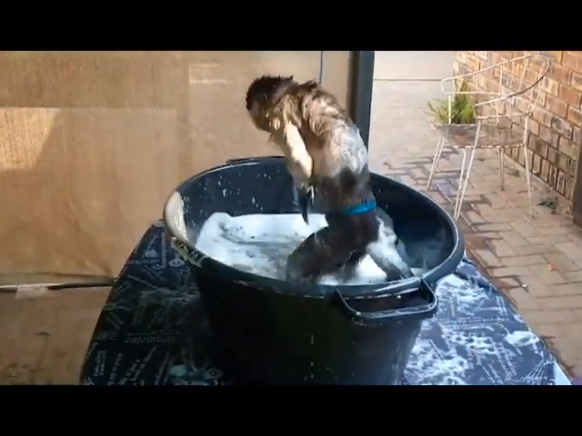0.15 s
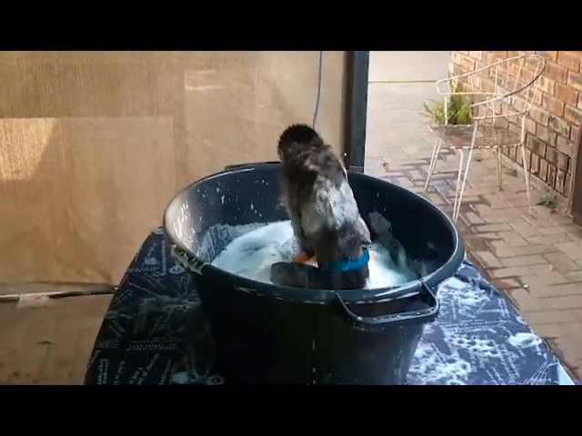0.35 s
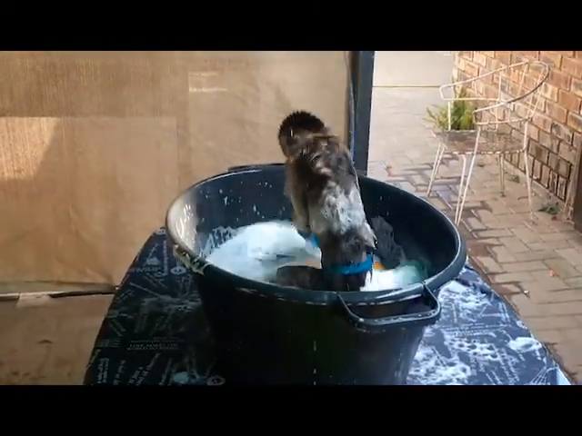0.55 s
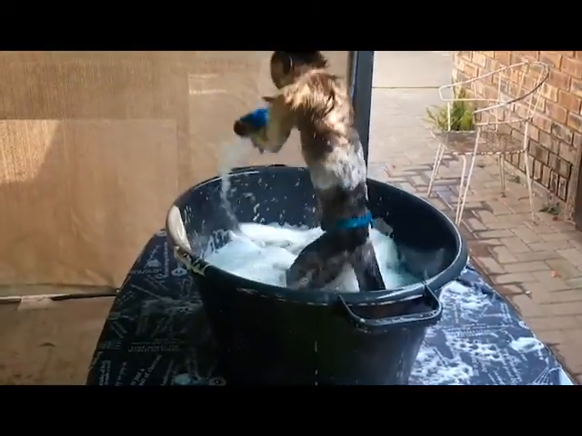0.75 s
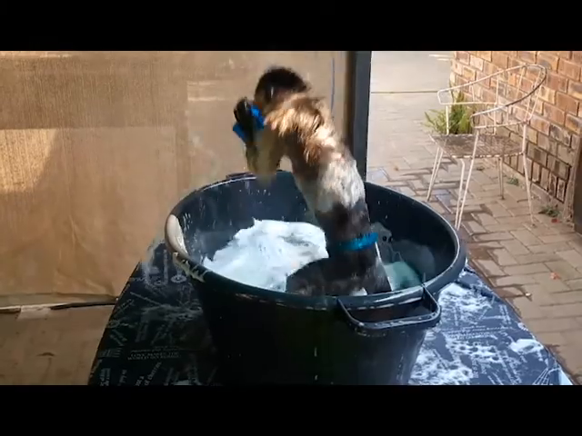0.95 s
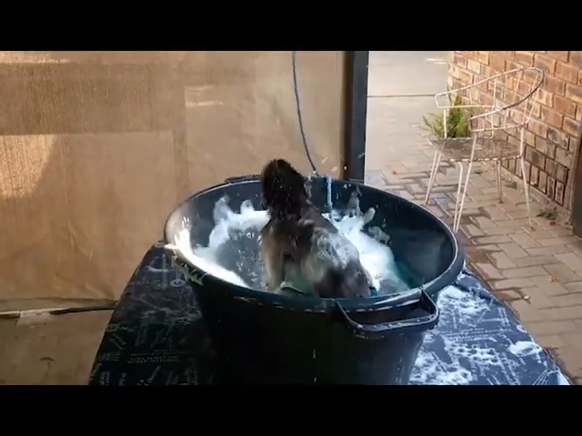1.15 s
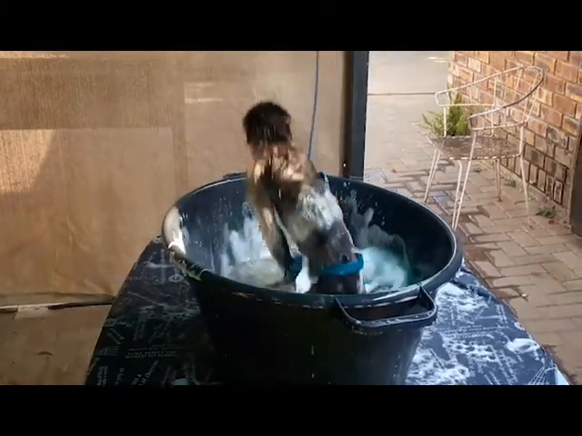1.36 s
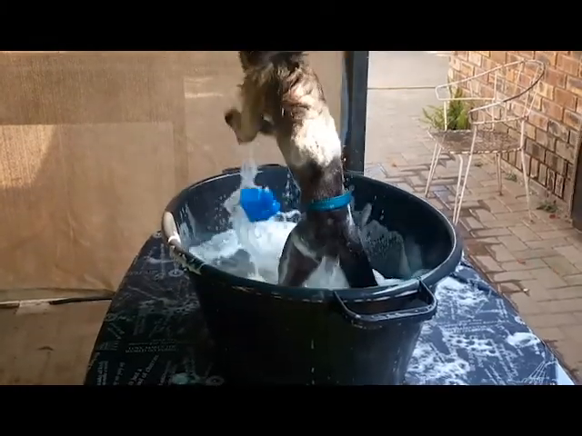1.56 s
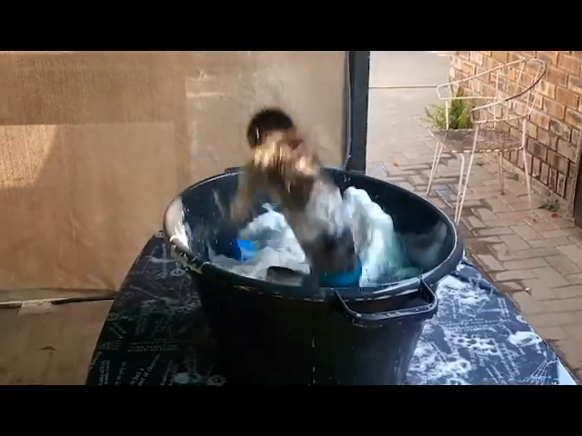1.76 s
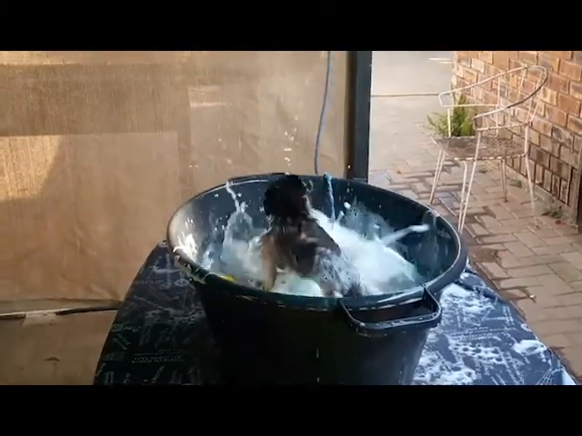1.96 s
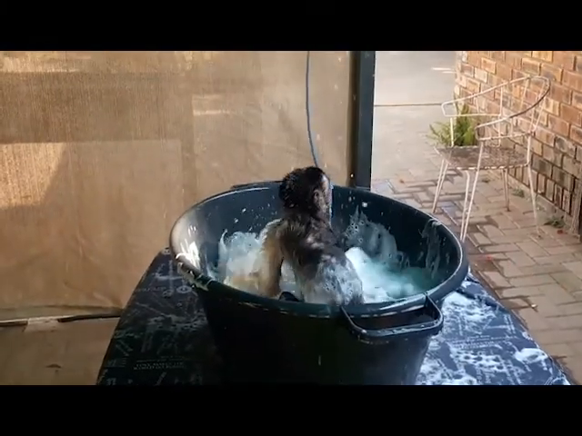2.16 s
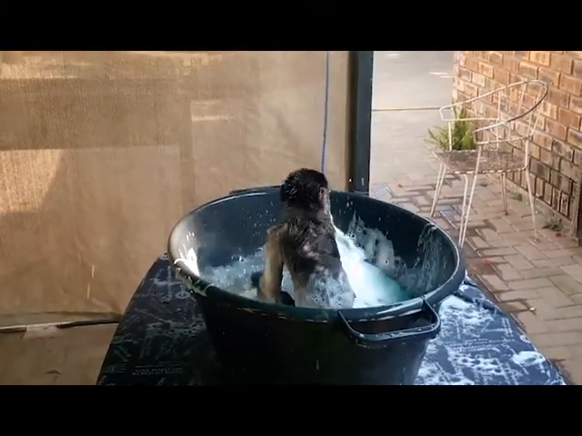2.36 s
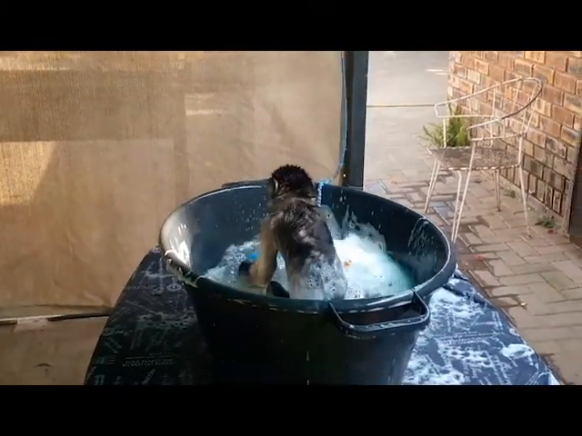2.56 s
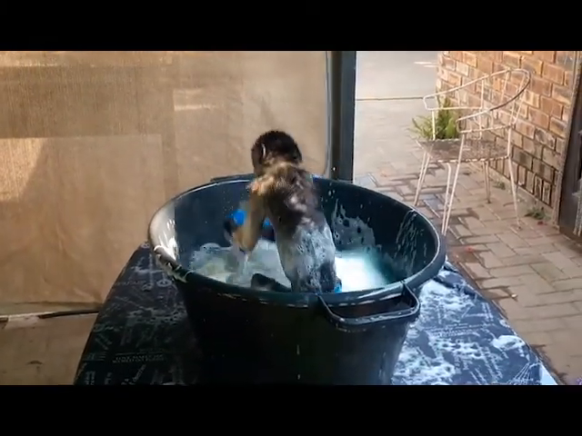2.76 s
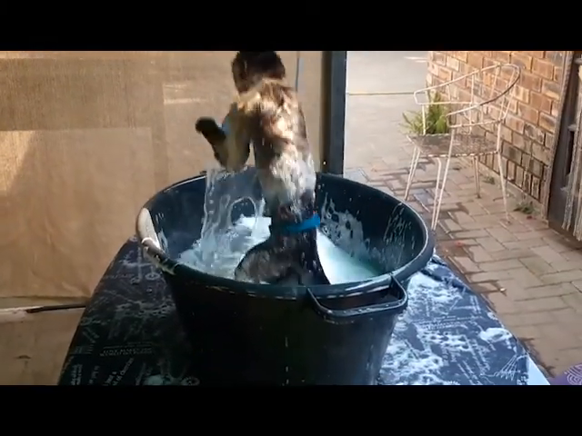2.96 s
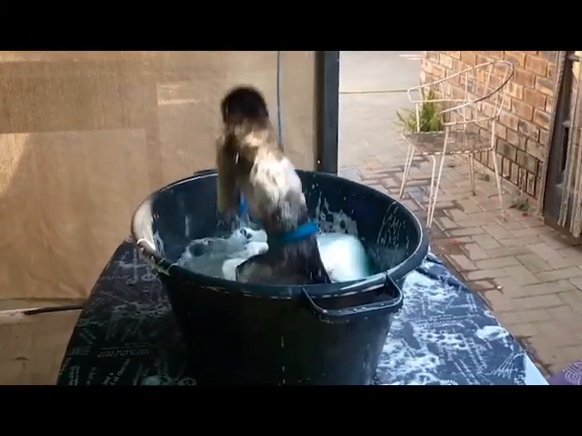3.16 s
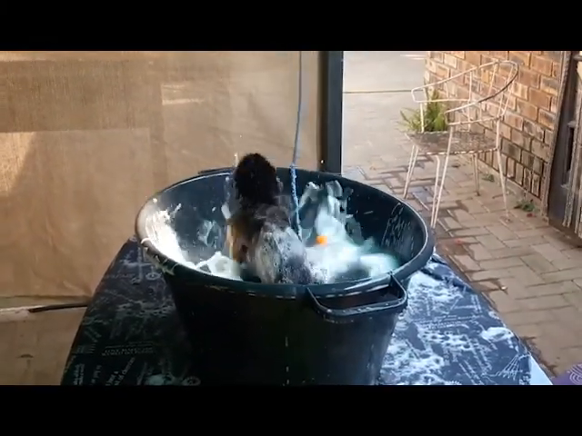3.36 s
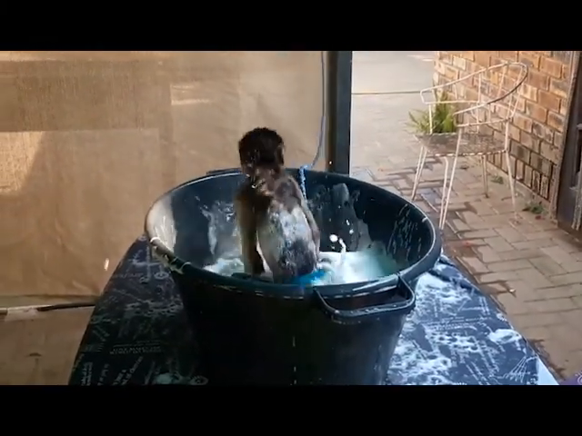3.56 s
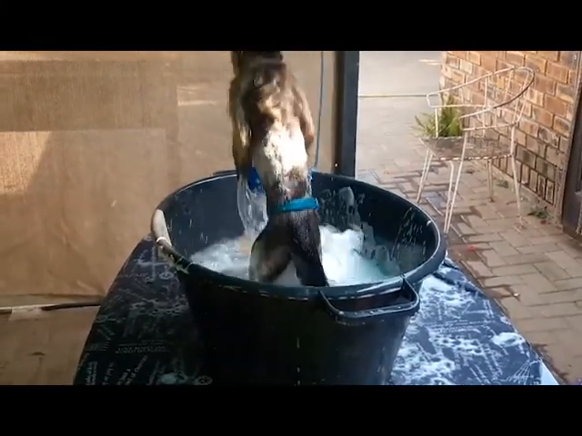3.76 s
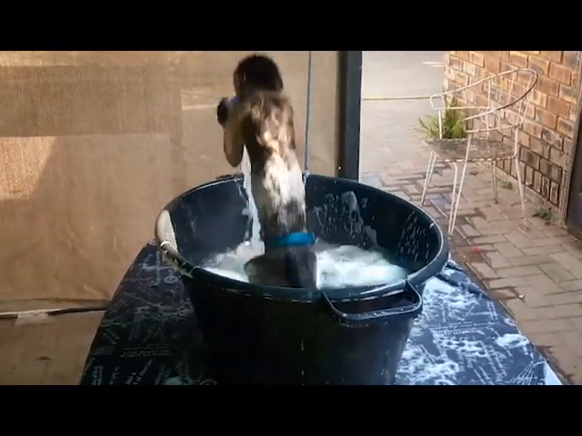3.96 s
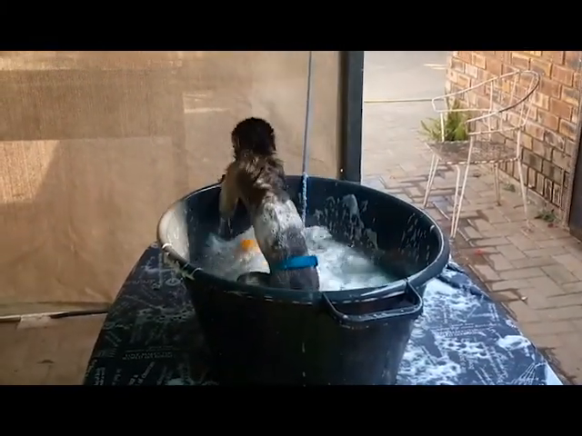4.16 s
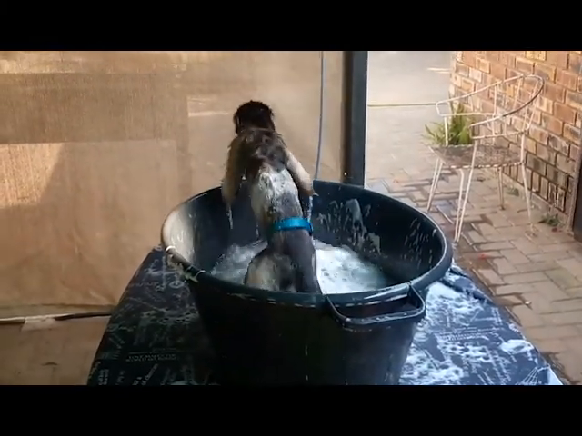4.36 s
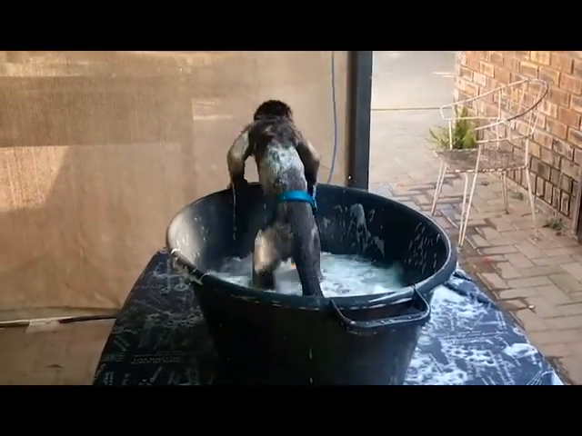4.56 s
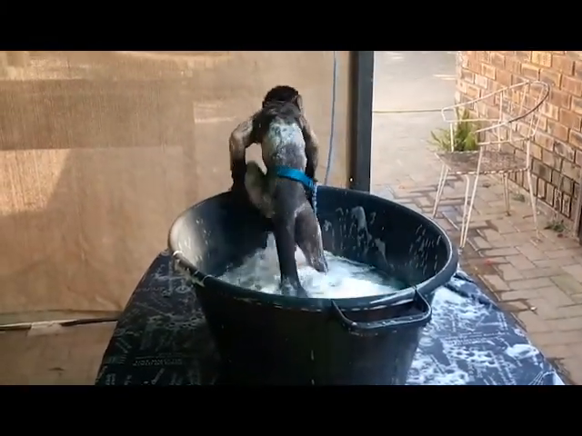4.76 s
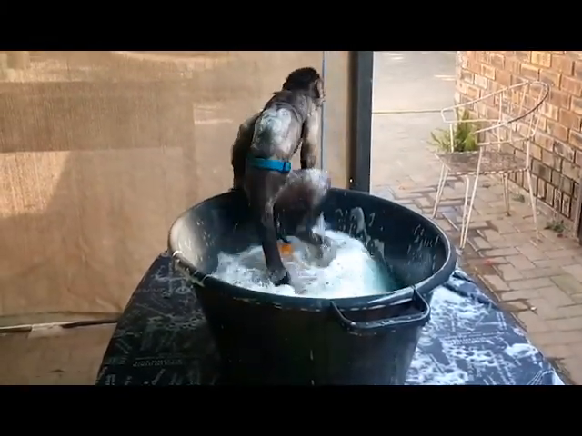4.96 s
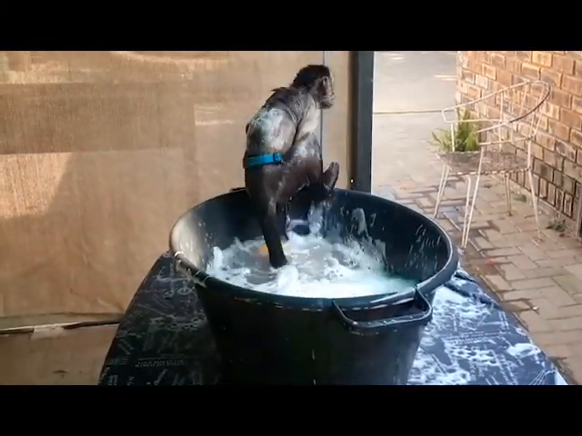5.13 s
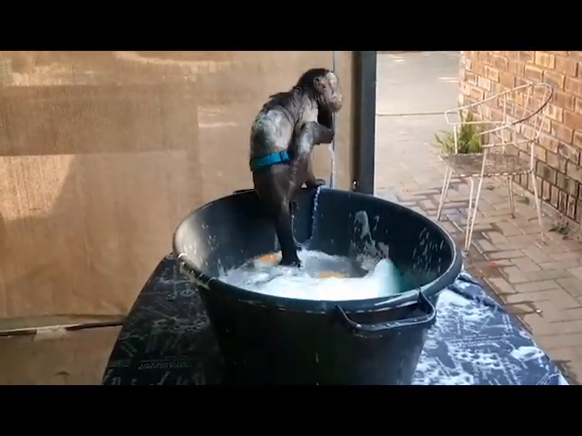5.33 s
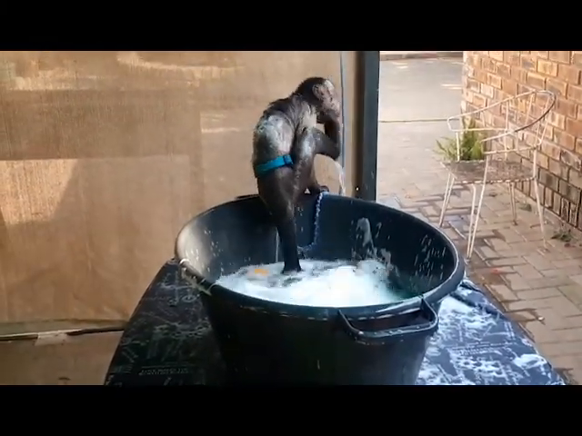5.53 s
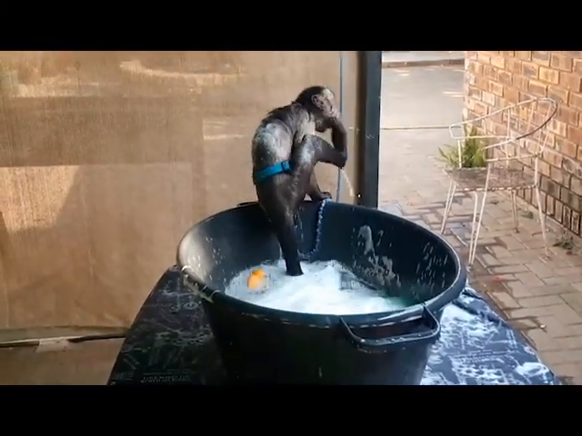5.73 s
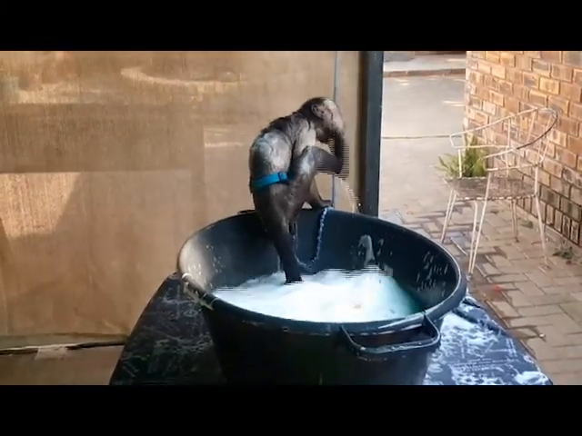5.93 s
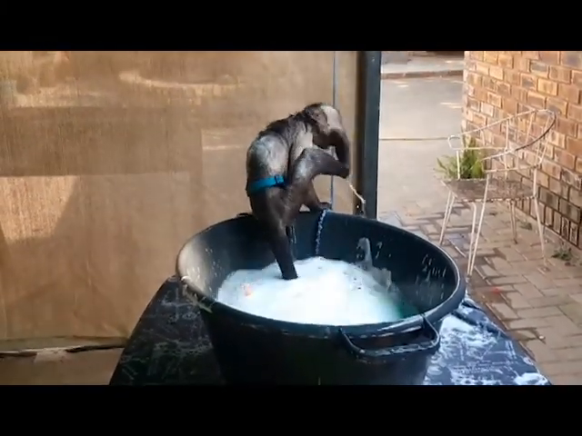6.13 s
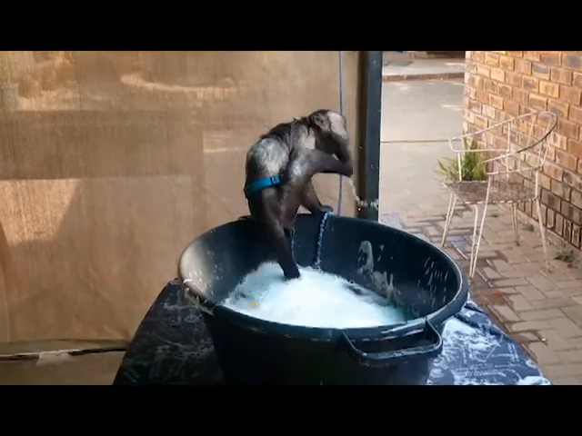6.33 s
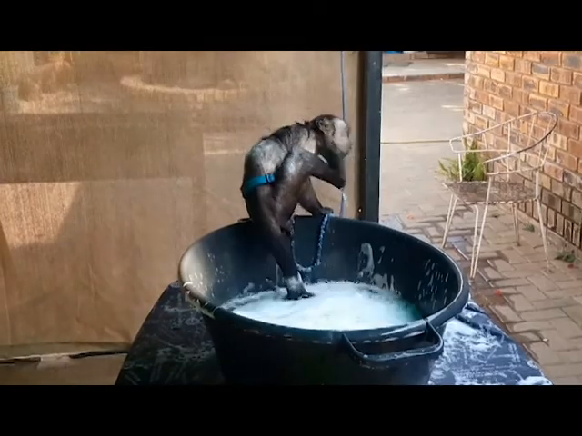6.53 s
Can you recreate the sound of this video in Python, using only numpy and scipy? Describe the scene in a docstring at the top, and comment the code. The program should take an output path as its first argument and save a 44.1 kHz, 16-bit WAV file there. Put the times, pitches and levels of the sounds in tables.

```python
"""In a walled yard, a small monkey jumps and paddles in a plastic tub of soapy water, heard by two microphones.
Slaps are bursts of noise and bubbles; spray is bright noise; trapped air pockets are gliding, dying tones.
Between slaps the water churns with clouds of small bubbles and foam, and drips and drops tick.
The tub rings dully with all of it; dull tones bump as the monkey climbs on the rim and the water settles.
Behind lie echoes of the yard and outdoor noise that drops quickly after the loudest slaps, then creeps back up."""
import sys
import numpy as np
from scipy import signal
from scipy.fft import rfft, irfft, next_fast_len
from scipy.io import wavfile
from scipy.ndimage import uniform_filter1d

SR = 44100
rng = np.random.default_rng(int(sys.argv[2]) if len(sys.argv) > 2 else 0)


def wrap_up_sound(samples):
    """Save the sound to the file named by the first command line argument, as 16-bit audio."""
    columns = np.atleast_2d(samples).T
    # keep every value between -1 and 1, then stretch to whole-number steps
    tamed = np.clip(columns, -1, 1)
    steps = np.round(tamed * 32767).astype(np.int16)
    wavfile.write(sys.argv[1], SR, steps)


N = 290619
TIME = np.arange(N) / SR
EDGE_HZ = 16100  # top of the recorded band

# colour of splashing water: pitch_hz, relative level_db per Hz
SPLASH_COLOUR = [(30, -36), (80, -36), (165, -16.5), (320, -4.5), (560, -21), (770, -13.5), (1200, -11.5),
                 (1650, -13.5), (2450, -12.5), (3300, -13), (4900, -16.5), (7400, -17), (9600, -27),
                 (16000, -33.5)]
# likeness of the two microphones for water: pitch_hz, likeness (0-1)
WATER_LIKENESS = [(100, 1), (600, 1), (1200, 0.9), (3000, 0.17), (7000, 0), (16000, 0.19)]
# likeness of the two microphones for outdoor air and echoes: pitch_hz, likeness (0-1)
AIR_LIKENESS = [(30, 1), (70, 0.68), (150, 0.99), (500, 0.67), (1500, 0), (4000, 0), (16000, 0.17)]


def amp(db):
    """Decibels to gain."""
    return 10 ** (np.asarray(db) / 20)


def evened(x):
    """Scales to rms 1."""
    return x / np.sqrt(np.mean(x ** 2) + 1e-20)


def read(points, hz):
    """Reads a table on a log-frequency axis."""
    f, value = np.transpose(points)
    return np.interp(np.log(hz + 1), np.log(f + 1), value)


def over_time(points):
    """Reads a table of start_s and value at every sample."""
    return np.interp(TIME, *np.transpose(points))


def add(mix, s, sound):
    """Mixes a sound in at time s."""
    part = mix[..., max(round(s * SR), 0):][..., :sound.shape[-1]]
    part += sound[..., :part.shape[-1]]


def band(x, lo_hz, hi_hz, order=3):
    """Causal band-pass."""
    edges = [lo_hz, min(hi_hz, SR / 2 - 1)]
    return signal.sosfilt(signal.butter(order, edges, "band", fs=SR, output="sos"), x)


def noise_pair(colour, likeness):
    """Coloured noise at two microphones, as alike at each frequency as the likeness table says."""
    size = next_fast_len(N)
    hz = np.fft.rfftfreq(size, 1 / SR)
    a, b = rfft(rng.standard_normal((2, size)))
    same = np.clip(read(likeness, hz), 0, 1)
    mid, side = a * np.sqrt(1 + same), b * np.sqrt(1 - same)
    spectra = np.array([mid + side, mid - side]) * amp(read(colour, hz))
    return evened(irfft(spectra, size)[:, :N])


def spatter(per_s, spread_db):
    """Water lands as many separate droplets: a gain that moves between random levels at random moments."""
    knots = np.cumsum(rng.exponential(1 / per_s, 40000))
    levels = np.clip(rng.standard_normal(len(knots)), -2.5, 2.5)
    return evened(amp(spread_db * np.interp(TIME, knots, levels)))


def fading(s, rise, t60):
    """Envelope of a burst that starts at s: a straight rise, then an even decay in dB."""
    t = TIME[:min(int((rise + t60) * SR), N - round(s * SR))]
    return np.minimum(t / rise, 1) * amp(-60 * np.maximum(t - rise, 0) / t60)


def burst(layer, s, rise, t60):
    """A short stretch of a steady texture, evened under an envelope that peaks at 1."""
    shape = fading(s, rise, t60)
    stretch = layer[:, round(s * SR):][:, :len(shape)]
    return evened(stretch * shape) * np.sqrt(np.mean(shape ** 2))


def ping(hz, t60, glide, soft_cycles):
    """A dying oscillation; with glide its pitch climbs, as a bubble's does near the surface."""
    t = np.arange(int(t60 * SR) + 2) / SR
    wave = np.sin(2 * np.pi * hz * t * (1 + glide * t / t60 / 2))
    onset = 1 - np.exp(-t * hz / soft_cycles)
    return wave * amp(-60 * t / t60) * onset


def pockets(rows, glide, soft_cycles):
    """Single large oscillations, the same at both microphones."""
    out = np.zeros(N)
    for s, hz, db, t60 in rows:
        add(out, s, amp(db) * ping(hz, t60, glide, soft_cycles))
    return out


def bubbles(lo_hz, hi_hz, per_s, cycles, spread_db, width, tilt_db, count=48):
    """A cloud of bubbles of many sizes, each popping at its own moment and place; tilt is per octave."""
    out = np.zeros((2, N))
    for hz in np.geomspace(lo_hz, hi_hz, count):
        for when, size, detune, life, place in rng.random((int(per_s * N / SR / count), 5)):
            pitch = hz * (1 + (detune - .5) / 10)
            size_db = spread_db * min(-np.log(1 - size), 3)  # few are loud
            gain = amp(size_db + tilt_db * np.log2(pitch / lo_hz))
            sound = gain * ping(pitch, cycles * (.5 + life) / pitch, glide=0.046, soft_cycles=0.25)
            shift_s = width * (place - .5)  # later at one microphone, earlier at the other
            add(out[0], when * N / SR + shift_s, sound)
            add(out[1], when * N / SR - shift_s, sound)
    # hold the cloud's level steady
    power = uniform_filter1d((out ** 2).mean(0), size=6000)
    return out / np.sqrt(power + 1e-4 * np.mean(out ** 2))


def slaps():
    """Limbs and lumps of water hit: bursts of droplet impacts and bubbles, lower in pitch for a bigger mass."""
    # slaps: start_s, t60_s, level_db, pitch_hz, spray_db
    hits = [(.045, 0.012, -32, 3500, -28.5), (0.0768, 0.013, -30, 3050, -46),
            (0.1809, 0.033, -27, 1700, -47), (.204, .06, -26.5, 665, -36),
            (0.2391, 0.004, -13, 1290, -21.5), (0.262, 0.025, -41, 900, -47),
            (0.644, 0.011, -35, 1200, -39.5), (0.941, .04, -39.5, 1820, -65),
            (1.118, 0.081, -13, 307, -20.5), (1.131, 0.13, -20, 1400, -46), (1.211, 0.064, -24, 322, -44),
            (1.287, 0.57, -30.5, 2270, -57), (1.318, 0.1, -34, 1600, -50), (1.421, 0.14, -34.5, 2800, -41),
            (1.488, 0.17, -31, 865, -51), (1.662, 0.083, -28, 1870, -34.5),
            (1.7237, 0.12, -28, 2110, -36.5), (1.822, 0.026, -20, 900, -20),
            (1.837, 0.49, -28.5, 1280, -38), (1.861, 0.024, -15, 1400, -17.5),
            (1.896, 0.047, -29, 382, -48), (1.9384, 0.04, -17.5, 556, -58), (1.975, 0.42, -28.5, 1080, -46),
            (2.037, 0.017, -26, 2000, -33.5), (2.109, .12, -33.5, 1890, -60),
            (2.149, 0.049, -37, 1400, -47), (2.191, 0.029, -37, 2700, -41),
            (2.7862, 0.074, -36.5, 1900, -65), (3.05, 0.14, -37.5, 2070, -67),
            (3.114, 0.13, -32, 2400, -68), (3.2467, 0.12, -14.5, 1890, -27),
            (3.2657, 0.049, -14.5, 920, -44), (3.316, 0.07, -19, 550, -36.5), (3.39, 0.065, -36, 1800, -45),
            (3.419, .18, -26.5, 1320, -34.5), (3.536, 0.18, -31, 1600, -45), (3.698, 0.15, -39, 1900, -67),
            (3.724, 0.36, -38.5, 710, -49.5), (4.059, 0.04, -27, 2700, -50),
            (4.1017, 0.038, -6.5, 1260, -41), (4.113, 0.18, -19, 690, -55), (4.1938, 0.052, -8.5, 650, -57),
            (4.216, 0.16, -23.5, 680, -44), (4.805, 0.038, -38, 1100, -65),
            (4.824, 0.054, -34.5, 3180, -60), (4.871, 0.056, -40, 1800, -48),
            (4.885, 0.063, -37.5, 1940, -36.5), (5.044, 0.29, -46.5, 1900, -74),
            (5.676, 0.11, -43, 1400, -48.5), (5.964, 0.053, -43, 1200, -59), (6.086, 0.085, -44, 1300, -64)]
    # bands of push, body, crack and spray: low_hz, high_hz
    slap_bands = [(100, 500), (500, 1400), (1400, 4000), (4000, 16000)]
    # colour of the spray in each of those bands: level_db
    spray_colour_db = [-12.5, -19.5, 4, 1.5]
    rise_s, rise_share = 0.0011, 0.014  # swell: a fixed time plus a share of t60
    low_extra_s = 0.0014  # the lowest band swells longer
    fall_db = 3.5  # loss away from the pitch, per octave squared
    impacts = noise_pair(SPLASH_COLOUR, WATER_LIKENESS) * spatter(per_s=1500, spread_db=5)
    gurgle = amp(0.5) * bubbles(610, 2985, per_s=1100, cycles=12.0, spread_db=3.5,
                                width=0.00016, tilt_db=5.5)
    # the low push is moving water alone; bubbles ring above it
    layers = [band(impacts + gurgle * (k > 0), lo, hi) for k, (lo, hi) in enumerate(slap_bands)]
    centres = np.sqrt(np.prod(slap_bands, axis=1))
    out = np.zeros((2, N))
    for s, t60, db, hz, spray_db in hits:
        plop = amp(db - fall_db * np.log2(centres / hz) ** 2)
        gains = np.hypot(plop, amp(spray_db) * amp(spray_colour_db))
        for k, (layer, gain) in enumerate(zip(layers, gains)):
            rise = rise_s + rise_share * t60 + (low_extra_s if k == 0 else 0)
            add(out, s, gain * burst(layer, s, rise, t60))
    return out


def gulps():
    """Large trapped air pockets each ring once, their pitch climbing as they die."""
    # air pockets: start_s, pitch_hz, level_db, t60_s
    air_pockets = [(.390, 940, -15.5, 0.0057), (.711, 433, -28, 0.013), (1.121, 166.3, -10, 0.092),
                   (1.122, 322, -20, 0.084), (1.136, 770, -6.5, 0.02), (1.158, 720, -12.5, 0.025),
                   (1.209, 707, -14, 0.022), (1.32, 537, -17, .038), (1.322, 811, -24.5, 0.16),
                   (1.49, 309, -32.5, .09), (1.94, 388, -19, 0.044), (1.954, 192, -21.5, .064),
                   (2.115, 1003, -25, 0.079), (3.267, 420, -10, 0.033), (3.269, 828, -10.5, 0.051),
                   (3.321, 700, -4, 0.032), (3.322, 990, -6.5, 0.026), (4.103, 845, -3, 0.038),
                   (4.104, 460, -16, 0.04), (4.105, 964, -10.5, 0.079), (4.116, 1223, -9, 0.11),
                   (4.118, 112, -30, 0.14), (4.197, 168, -17.5, .13)]
    return pockets(air_pockets, glide=0.088, soft_cycles=0.58)


def sprays(lo_hz=3200, rise_share=0.0085):
    """Thrown spray lands back on the water as fine drops: a bright patter that dies away."""
    # sprays: start_s, t60_s, level_db
    showers = [(0.23, 0.04, -26), (0.36, 0.037, -33), (.709, .08, -45), (.82, 0.15, -43),
               (1.017, 0.02, -39.5), (1.053, 0.12, -37.5), (2.209, 0.22, -32.5), (2.29, 0.68, -49),
               (2.398, 0.17, -46.5), (2.572, 0.77, -49), (2.693, 0.13, -41.5), (2.94, 0.11, -40.5),
               (3.171, 0.065, -37), (4.005, 0.39, -38), (4.275, 0.22, -43), (5.163, 0.038, -44),
               (5.49, 0.22, -53), (5.584, 0.16, -38.5), (5.966, 0.11, -45)]
    drops = noise_pair(SPLASH_COLOUR, WATER_LIKENESS) * spatter(per_s=1200, spread_db=2.5)
    patter = band(drops, lo_hz, EDGE_HZ, order=2)
    out = np.zeros((2, N))
    for s, t60, db in showers:
        add(out, s, amp(db) * burst(patter, s, rise_share * t60, t60))
    return out


def agitation(build_s=0.037):
    """Draining swells as the monkey lifts itself; after landing the wash swings and settles, its foam last."""
    # leaps: landing start_s, lift_s, drain_db, wash_db, wash t60_s
    leaps = [(.2, 0.25, -45, -37, 0.49), (1.12, 0.26, -34, -30.5, 2.18), (1.83, 1.2, -41.5, -22, 0.88),
             (3.25, 1.02, -37, -28, 1.17), (4.1, 0.97, -38, -26.5, 0.54)]
    swing_s, swing_db = 0.2017, 4  # period across the tub, and dB above and below the mean
    foam_linger = 1.044  # foam t60 over wash t60
    t = TIME[::64]
    drain, wash, froth = np.zeros((3, len(t)))
    for s, lift_s, drain_db, wash_db, t60 in leaps:
        before, after = np.maximum(s - t, 0), np.maximum(t - s, 0)
        landed = np.minimum(after / build_s, 1)
        swing = landed * amp(wash_db + swing_db * np.cos(2 * np.pi * after / swing_s))
        drain += (1 - landed) * amp(drain_db - 60 * before / lift_s)
        wash += swing * amp(-60 * after / t60)
        froth += swing * amp(-60 * after / (t60 * foam_linger))
    return [np.interp(TIME, t, level) for level in (drain, wash, froth)]


def slops(per_s=26, decay_s=.02, steady=0.57):
    """The surface breaks in small slops at random: a gain that jumps with each and falls back."""
    hits = (rng.random(N) < per_s / SR) * rng.uniform(.3, 1, N)
    falls = signal.lfilter([1], [1, -np.exp(-1 / (decay_s * SR))], hits)
    return evened(steady + falls)


def churn(plips_db=-5):
    """Agitated water: deep slosh, bubbles over torn water, bursting foam and stray drops from the wet fur."""
    # gentle lapping under everything: start_s, level_db
    lapping = [(0, -51.5), (.9, -56.5), (2.55, -64.5), (3.9, -60.5), (4.45, -69), (4.85, -57),
               (5.15, -58.5), (5.3, -66), (5.55, -58), (5.95, -54.5), (6.59, -63)]
    # deep slosh and foam against the bubbling of the wash, the draining and the lapping
    wash_deep_db, wash_foam_db, drain_foam_db = -8, -10, -6
    lap_deep_db, lap_foam_db = -7.5, -4.5
    drain, wash, froth = agitation()
    lap = amp(over_time(lapping))
    slosh = np.hypot(amp(wash_deep_db) * wash, amp(lap_deep_db) * lap)
    bubbling = np.hypot(wash + drain, lap)
    fizz = np.hypot(amp(wash_foam_db) * froth + amp(drain_foam_db) * drain, amp(lap_foam_db) * lap)
    water = noise_pair(SPLASH_COLOUR, WATER_LIKENESS)
    wavelets = spatter(per_s=55, spread_db=2.0)  # the foam bursts in small clumps
    deep = bubbles(153, 534, per_s=120, cycles=15.5, spread_db=5.0, width=.0001, tilt_db=6.5)
    cloud = bubbles(508, 3090, per_s=520, cycles=50.0, spread_db=7.5, width=0.00019, tilt_db=2.5)
    torn = evened(band(water * spatter(per_s=330, spread_db=2.5), 1200, 3150))
    foam = evened(band(water * spatter(per_s=1200, spread_db=4), 3440, EDGE_HZ))
    plips = amp(plips_db) * bubbles(1067, 4400, per_s=75, cycles=26, spread_db=1,
                                    width=0.00033, tilt_db=2, count=24)
    surface = slops() * bubbling * (amp(-3.5) * cloud + amp(-3.0) * torn)
    return slosh * deep + surface + wavelets * fizz * foam + np.hypot(drain, lap) * plips


def drips(cycles=24, scatter=0.15, scatter_per_s=1.52, width=0.00021, count=12):
    """Each drip sheds a run of bubbles of like size; a longer trickle sheds more varied sizes."""
    # drips and trickles: start_s, length_s, pitch_hz, level_db
    trickles = [(0.045, .0043, 2830, -29.5), (0.077, 0.0018, 2600, -23.5), (0.297, .02, 2300, -42),
                (1.665, .005, 1280, -21.5), (1.977, .004, 1920, -18), (2.036, 0.0049, 1700, -16),
                (2.202, 0.023, 4650, -34.5), (2.698, .007, 5500, -36.5), (2.3473, 0.00388, 2390, -33),
                (2.368, .016, 2390, -45), (2.745, 0.027, 2370, -38.5), (2.784, 0.012, 2970, -31),
                (3.168, 0.025, 4000, -38), (3.696, .04, 1810, -36.5), (3.8, 0.035, 1860, -43.5),
                (4.097, 0.036, 2070, -29), (4.2, .04, 2230, -28.5), (4.734, 0.053, 1740, -51.5),
                (5.034, .04, 2290, -49.5), (5.09, .1, 1930, -48.5), (5.91, 0.0096, 1400, -45),
                (5.936, .006, 1360, -37.5), (6.579, 0.02, 1920, -43.5)]
    out = np.zeros((2, N))
    all_draws = 2 * rng.random((len(trickles), count, 3)) - 1
    for (s, length, hz, db), draws in zip(trickles, all_draws):
        run = np.zeros((2, SR // 5))
        for k, (when, size, place) in enumerate(draws):
            pitch = hz * np.exp((scatter + scatter_per_s * length) * size)
            sound = ping(pitch, cycles / pitch, glide=0.079, soft_cycles=1.0) / np.sqrt(1 + k / 4)
            at = length * (k + .5 + when / 2) / count
            add(run[0], at + width * place, sound)
            add(run[1], at - width * place, sound)
        # level holds over the drip's length
        add(out, s, amp(db) * evened(run) * np.sqrt(length * SR / run.shape[1]))
    return out


def ticks(t60=0.013, rise=0.00069, lo_hz=4500):
    """A flung drop shatters on hard plastic or the table: a very short, bright crack of noise."""
    # drops on hard surfaces: start_s, level_db
    drop_hits = [(.047, -21.5), (0.116, -31), (.2148, -22), (0.23, -26), (.288, -28), (.361, -27),
                 (0.644, -34), (4.8265, -46), (5.016, -44), (5.091, -37), (5.586, -32)]
    t, out = TIME[:SR // 20], np.zeros((2, N))
    shape = np.minimum(t / rise, 1) * amp(-60 * t / t60)
    for (s, db), crack in zip(drop_hits, rng.standard_normal((len(drop_hits), 2, len(t)))):
        add(out, s, amp(db) * band(crack * shape, lo_hz, EDGE_HZ, order=1))
    return out


def echo(x, t60s, delay):
    """Sparse reflections of random sign, each band dying at its own speed."""
    size = SR // 2
    signs = rng.choice([-1., 1.], (2, size))
    taps = signs * (rng.random((2, size)) < .08) * (TIME[:size] > delay)
    hz, t, z = signal.stft(taps, SR, nperseg=128)
    same = np.clip(read(AIR_LIKENESS, hz), 0, 1)[:, None]
    z[1] = same * z[0] + np.sqrt(1 - same ** 2) * z[1]
    decay = amp(-60 * t / read(t60s, hz)[:, None])
    tail = signal.istft(z * decay, SR, nperseg=128)[1]
    return signal.fftconvolve(x, tail / np.linalg.norm(tail[0]), axes=1)[:, :N]


def tub(x, walls_db=-11):
    """The tub and the air in it ring at their modes, and its walls scatter the sound."""
    # modes: pitch_hz, level_db over the direct sound, width_hz
    modes = [(168, -23, 6.1), (322, -6.5, 43), (449, 4, 44), (703, -7.5, 14), (765, 4, 50), (1037, -15, 37),
             (1210, -4.5, 25), (1400, -11, 41), (1496, 2, 10), (1790, -3.5, 46), (2214, 0, 21),
             (2438, -3.5, 73), (2870, -13.5, 5.1)]
    ring = sum(amp(db) * signal.lfilter(*signal.iirpeak(hz, hz / width, SR), x)
               for hz, db, width in modes)
    walls = echo(x, [(200, 0.047), (8000, 0.071)], delay=.002)
    return x + ring + amp(walls_db) * walls


def bumps():
    """Dull thuds as the monkey steps and shifts on the rim: low dying tones, leaning right."""
    # bumps: start_s, pitch_hz, level_db before the lean, t60_s
    steps = [(.259, 117, -35.5, 0.078), (5.16, 122, -41.5, 0.09), (6.324, 146, -23.5, 0.035),
             (6.36, 110, -35, 0.27), (6.436, 207.5, -40, 0.17), (6.466, 155, -25.5, 0.031),
             (6.578, 112.6, -28.5, 0.043)]
    return pockets(steps, glide=0, soft_cycles=0.32) * amp([[-5], [5]])


def yard(near):
    """The walls of the yard return the sound, with its own decay time at each frequency."""
    # yard echo: pitch_hz, t60_s
    yard_t60 = [(150, 0.1), (800, 0.3), (3000, 0.23), (8000, 0.14), (16000, 0.087)]
    return amp(-17.0) * echo(near, yard_t60, delay=0.014)


def outdoor_air():
    """Outdoor background: coloured noise that drops quickly after the loudest slaps, then creeps back up."""
    # colour: pitch_hz, relative level_db per Hz
    air_colour = [(10, -19), (30, -22.5), (55, 3.5), (120, 2.5), (240, 2.5), (500, -2.5), (750, -1),
                  (1250, -7), (2500, -14), (4000, -26), (8200, -22.5), (9600, -33), (16000, -25.5)]
    # level of the background: start_s, level_db
    air_level = [(0, -52.5), (.6, -56.5), (1, -52), (3, -53), (4, -49), (4.5, -59), (5.27, -57),
                 (5.55, -53), (6.59, -50)]
    return noise_pair(air_colour, AIR_LIKENESS) * amp(over_time(air_level))


def scene():
    """The water in its tub, the bumps on the rim, the yard and the air."""
    # where the water lands: start_s, left over right level_db
    landing = [(0, -4.5), (.2, 0.5), (1.1, 1.5), (3.2, 1.95), (6.59, 2.1)]
    water = slaps() + gulps() + sprays() + churn() + drips() + ticks()
    lean_db = over_time(landing)
    near = amp(-3.0) * tub(water) * amp(np.array([lean_db, -lean_db]) / 2)
    return near + bumps() + yard(near) + outdoor_air()


def record(dry):
    """The recorder drops the deepest bass, rounds off the hardest peaks, then limits the band."""
    lean = signal.sosfilt(signal.butter(2, 35, "high", fs=SR, output="sos"), dry)
    rounded = lean / (1 + lean ** 4) ** (1 / 4)
    lowpass = signal.firwin(511, EDGE_HZ, window=("kaiser", 9), fs=SR)
    return signal.oaconvolve(rounded, lowpass[None], "same")


dry = scene()
out = record(dry)
wrap_up_sound(out)
```